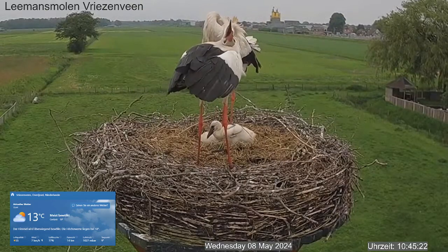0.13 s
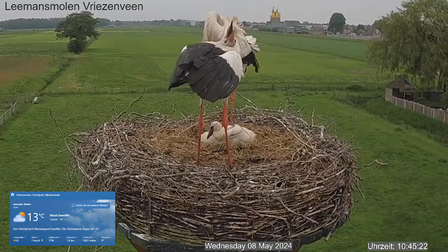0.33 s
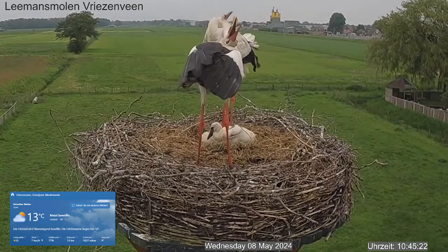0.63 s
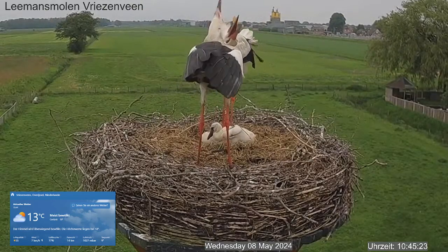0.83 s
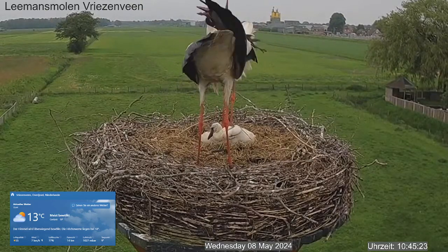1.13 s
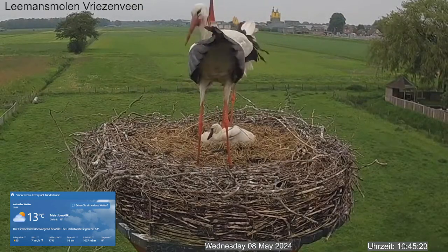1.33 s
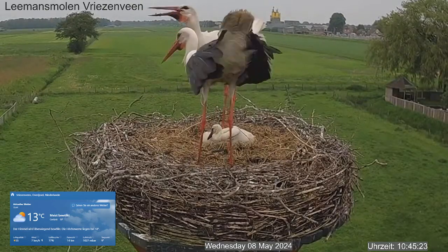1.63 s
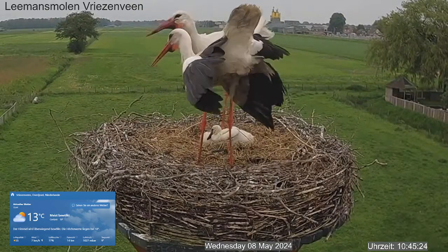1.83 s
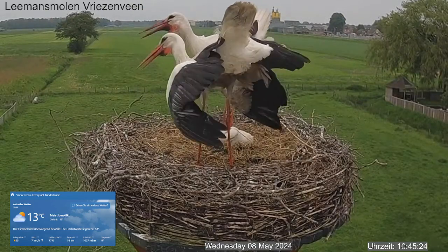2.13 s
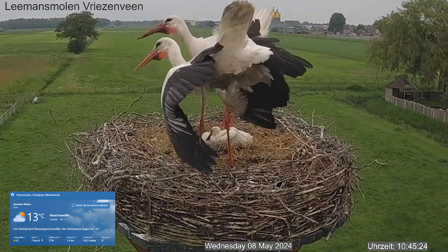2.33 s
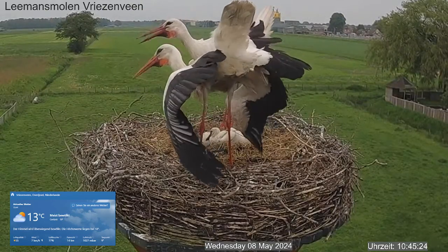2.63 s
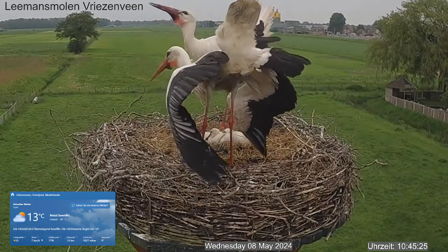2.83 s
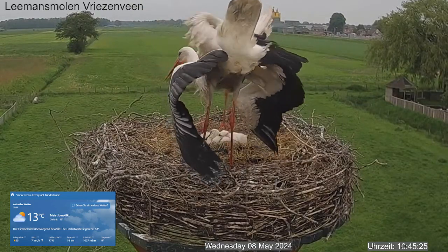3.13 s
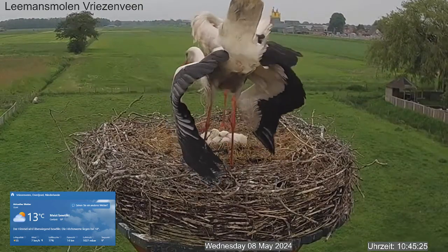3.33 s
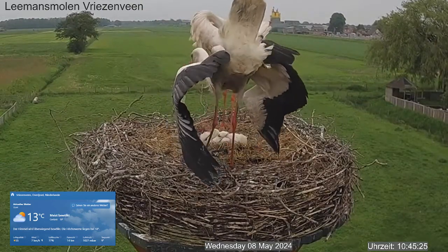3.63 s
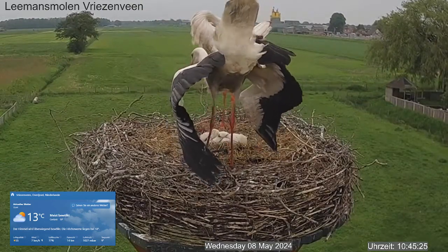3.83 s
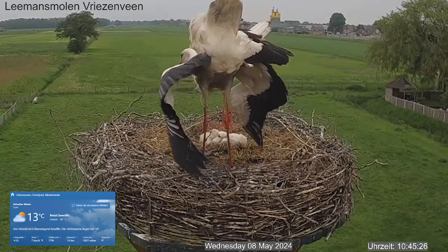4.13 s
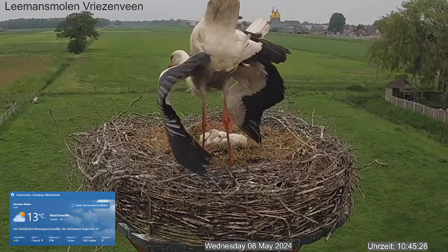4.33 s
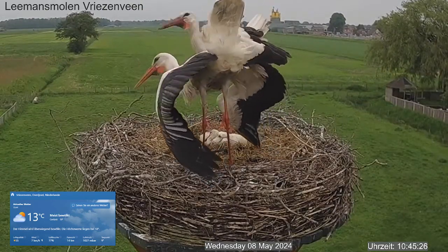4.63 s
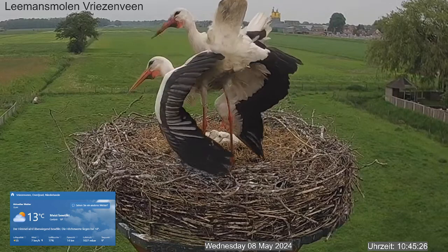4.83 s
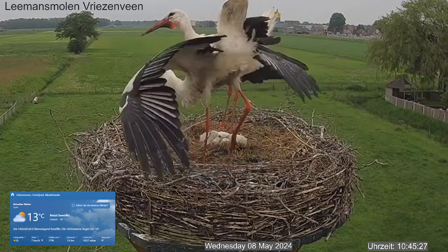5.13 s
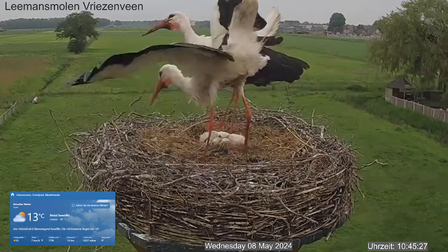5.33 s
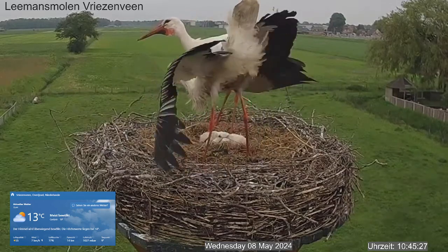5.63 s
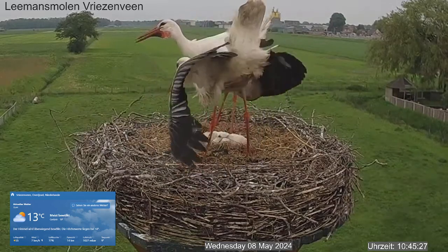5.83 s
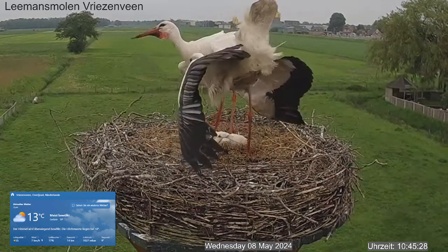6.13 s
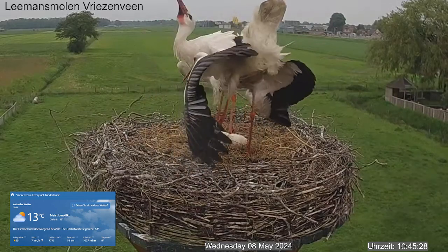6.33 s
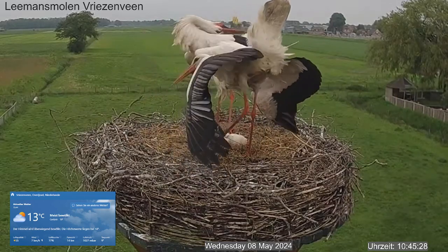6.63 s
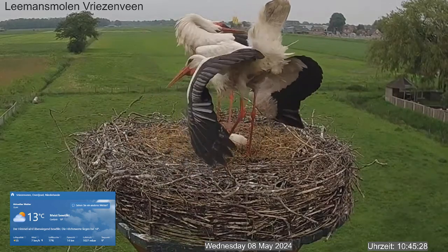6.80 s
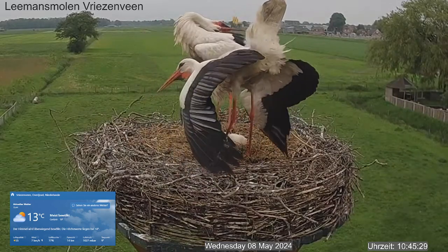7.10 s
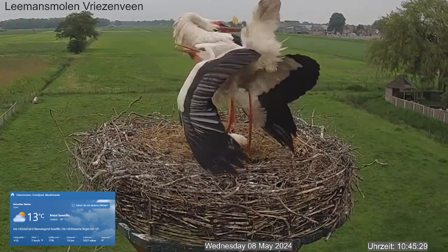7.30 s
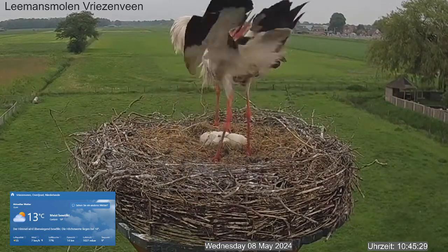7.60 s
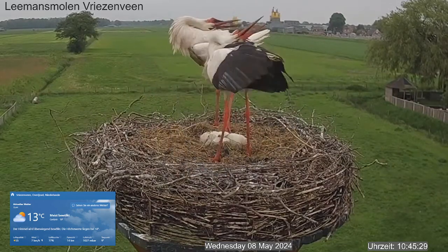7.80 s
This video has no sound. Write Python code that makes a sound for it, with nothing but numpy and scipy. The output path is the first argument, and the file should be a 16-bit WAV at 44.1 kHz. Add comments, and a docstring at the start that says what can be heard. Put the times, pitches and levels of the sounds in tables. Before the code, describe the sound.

Two storks clatter their bills together on a nest in open country. The hollow, wooden clacks run in two overlapping streams, one faster than the other, shifting in speed and pitch without stopping. Underneath, wing movements push scattered soft, low puffs of air onto the microphone. A few faint wheezy calls and feather rustles slip in between, over a very quiet outdoor hush.

```python
"""Hollow, rapid bill clatter from two white storks on a high nest in open country.
Each clack rings the bill and the throat pouch; their pitches shift as the neck bends back and forth.
Wings push puffs of air on to the microphone, thin wheezy calls sound in between, feathers rustle.
Twigs and fields echo the clatter faintly over quiet air."""
import sys
import numpy as np
from scipy import signal
from scipy.fft import rfft, irfft, next_fast_len
from scipy.io import wavfile
from scipy.ndimage import uniform_filter1d

SR = 44100
rng = np.random.default_rng(int(sys.argv[2]) if len(sys.argv) > 2 else 0)


def generate_wav(sig):
    """Save sig (samples, or channels by samples) to the path in sys.argv[1] as 16-bit PCM at SR."""
    pcm = np.round(np.clip(np.atleast_2d(sig).T, -1, 1) * 32767).astype(np.int16)
    wavfile.write(sys.argv[1], SR, pcm)


N = 351036
TIME_S = np.arange(N) / SR
CONTROL_S = TIME_S[::32]


def bill_clatter():
    """Two storks snap their bills. Neck back: bill rings low, pouch high; neck forward: the reverse."""
    # clacks: start_s, blow_db, ring_db, tick_db (ring and tick relative to the blow)
    slow_clacks = [(0.0004, 0, 7.5, -18.5), (0.094, 4.5, 5.5, -24.5), (0.1943, 4, 5.5, -28.5),
                   (0.2922, 4.5, 5.5, -27.5), (0.3923, 4, 6.5, -31), (0.4919, 3.5, 6, -30.5),
                   (0.5925, 4, 5.5, -31.5), (0.6936, 3, 7.5, -29.5), (0.8009, 3, 6.5, -27.5),
                   (0.9042, 1.5, 7.5, -27), (1.0126, 3.5, 4.0, -26.5), (1.1277, -2.5, 3.5, -25.5),
                   (1.2471, -5, -0.5, -28), (1.3752, -4.5, 4, -30.5), (1.5154, -9.5, -10, -22),
                   (1.6468, -5, -4, -22.5), (1.7891, 0.5, 1.5, -32.5), (1.9344, -1, 6, -34),
                   (2.0805, 4.0, 1.0, -28.5), (2.226, 5, 1.5, -29), (2.3724, 4.5, 2.5, -32),
                   (2.5163, 2.5, 3.5, -34.5), (2.6605, 4, 2, -33), (2.8021, 3, 1.0, -33),
                   (2.9444, 1.5, 4, -34.5), (3.0874, 0.5, 4.5, -35.5), (3.2307, 3, 3.5, -29.5),
                   (3.3724, 3.5, 1, -36.5), (3.5122, 6, -1.5, -29), (3.6549, -0.5, -0.5, -45),
                   (3.798, 1.5, -7, -43.5), (3.938, 6.5, -8.5, -36.5), (4.0798, 4, -9.5, -41),
                   (4.2197, 6.5, -5, -34), (4.3609, 4.5, 1, -41.5), (4.5046, -1.5, 7.5, -37),
                   (4.6506, 4.5, 1.5, -29.5), (4.7989, 3.5, 2, -29), (4.9458, 1, 7, -29.5),
                   (5.0915, 4, 4, -32), (5.2332, 0.5, 7, -36), (5.3789, 1, 1, -31), (5.5226, 4.5, 2, -35),
                   (5.6671, 2.5, 3, -33.5), (5.8144, -1, 5.5, -37), (5.9605, 2.5, 5.5, -36.5),
                   (6.1041, -2, 4, -38), (6.2468, 3, 5, -31), (6.3901, 3, 4.5, -31), (6.5332, 5, 1.5, -32),
                   (6.6742, -0.5, 1, -36.5), (6.8141, -2, 3, -36), (6.9509, 4.0, 1.5, -27),
                   (7.0888, 2.5, 2.0, -29.5), (7.2152, -2, 5.5, -35), (7.4712, -4, 10.5, -38),
                   (7.5582, -1.5, 12, -34), (7.6513, 2.5, 5, -39), (7.7474, 0.5, 7, -30.5),
                   (7.8404, 2.5, 5.5, -31.5), (7.9371, 4, 5.5, -32)]
    fast_clacks = [(0.087, -6.5, 8.5, -15), (0.1793, -4.5, 9, -16.5), (0.2714, -3.5, 8.0, -20),
                   (0.3647, -10, 11.5, -18.5), (0.4625, -10.0, 9, -16.5), (0.5608, -4.5, 8, -21.5),
                   (0.6585, -6, 9, -20.5), (0.7591, -4.5, 9, -17.5), (0.8627, -1.0, 5, -13.5),
                   (0.9732, 0, 9.5, -21.5), (1.0894, 2.5, 1.5, -24), (1.2096, 2, 1.5, -24),
                   (1.3306, 0, 0.5, -28), (1.4546, -1.5, 2.5, -24), (1.578, 1.5, 8, -21.5),
                   (1.7072, 2.5, 7.5, -27.5), (1.8316, 4.5, 3.5, -30.5), (1.9589, 3.5, 4, -29),
                   (2.0877, 5, 2.5, -31.5), (2.2129, 2, 7.5, -26), (2.341, 3.5, 5.5, -30.5),
                   (2.4658, -0.5, 7.5, -29.5), (2.5906, 2.5, 6, -27.5), (2.7111, 3.5, 5.5, -27),
                   (2.8207, 5, 2, -26.5), (2.9145, -5.5, 3.0, -36), (3.0918, -3, -3.5, -29.5),
                   (3.172, -22.5, 7.5, -21), (3.2519, -0.5, 7.5, -18), (3.3361, -8.5, 13.5, -17.5),
                   (3.4169, -9.0, 13, -19.5), (3.5016, -2.5, 9.5, -20.5), (3.5869, -7.0, 11.0, -20),
                   (3.67, 1.5, 6.5, -21), (3.7534, -6, 10.5, -18), (3.8398, -3, 10.5, -20.5),
                   (3.9282, -3.5, 9.5, -23), (4.0161, -6, 12.5, -34), (4.1056, 0, 7, -22),
                   (4.2013, 3, 6.5, -23), (4.306, -2.5, 10.5, -22), (4.4158, -2.5, 11, -34.5),
                   (4.5291, 2.0, 8.0, -27.5), (4.6449, -1.0, 9.5, -28), (4.7626, 0.5, 1.5, -24.5),
                   (4.8811, 3, 3, -29), (5.0055, 0.5, 7.5, -35), (5.1279, 2, 4.5, -27), (5.2547, 2, 5, -26),
                   (5.3825, 2.5, 6.5, -26), (5.5107, 2, 5, -28.5), (5.6381, -0.5, 6.5, -24.5),
                   (5.7642, -2, 9.5, -25), (5.8884, -1, 10, -27.5), (6.012, -0.5, 11, -24.5),
                   (6.1308, 1, 8.5, -25.5), (6.2362, -1.5, 11.5, -29), (6.3372, -0.5, 11, -30),
                   (6.4323, 2.5, 5.5, -32), (6.5211, -2, 1, -39), (6.6002, -11.5, 11.5, -42),
                   (6.7515, -6, 12, -23), (6.8274, -0.5, 6.5, -26), (6.9013, -3.0, 9, -27),
                   (6.9788, -2.5, 6.5, -26.5), (7.0599, -4, 10.5, -24.5), (7.1421, -1, 9, -23.5),
                   (7.2275, 2.5, 5.5, -25), (7.314, -6.0, 11.5, -29.5), (7.403, -2, 9, -36.5),
                   (7.4898, 4, -0.5, -37), (7.5783, 3.5, -1, -37), (7.6665, 3, 4.5, -40),
                   (7.7542, 4, 4.5, -38), (7.843, 5, 3, -33), (7.9429, 5.5, 4.5, -34)]
    # resonances by neck posture: time_s, bill_hz, pouch_hz, overtone_hz, bill_half_width_hz
    slow_posture = [(0, 1627, 797, 2545, 206), (.95, 1708, 833, 2520, 175), (1.14, 1810, 865, 2820, 165),
                    (1.379, 1760, 930, 2540, 130), (1.5, 2010, 830, 2530, 280),
                    (1.85, 2020, 750, 2710, 170), (2.5, 1995, 737, 2950, 134),
                    (2.799, 1970, 723, 2680, 150), (2.959, 1795, 716, 2720, 140),
                    (3.48, 1960, 730, 2760, 145), (4.34, 1955, 745, 2840, 139),
                    (4.63, 1820, 748, 2740, 142), (4.82, 1960, 742, 2810, 113),
                    (5.24, 1825, 785, 2660, 115), (5.669, 2004, 745, 2720, 90), (6.25, 1980, 766, 2760, 90),
                    (7.21, 1864, 794, 2700, 107.7), (7.461, 1544, 870, 2490, 113)]
    fast_posture = [(.08, 1650, 837, 2660, 79.6), (0.849, 1636, 813, 2560, 68.5),
                    (1.09, 1825, 755, 2880, 110), (1.21, 1890, 738, 2930, 165),
                    (1.449, 1940, 712, 2650, 221), (1.589, 1760, 688, 2530, 113),
                    (2.1, 1880, 686, 2585, 133), (2.901, 1800, 725, 2610, 121),
                    (3.101, 1570, 790, 2390, 78.5), (3.45, 1586, 883, 2600, 68),
                    (4.25, 1630, 870, 2730, 75.7), (4.639, 1786, 728, 2670, 138),
                    (4.92, 1934, 708, 2720, 135), (5.801, 1847, 693, 2600, 139),
                    (6.23, 1796, 740, 2610, 134), (6.52, 1740, 770, 2540, 70), (6.63, 1595, 875, 2200, 80),
                    (7.94, 1672, 920, 2455, 82.5)]
    # other bill modes; jaw, upper: ratio, half_width_hz; hollow (a notch): centre_hz, half_width_hz
    # ticks: pitch_hz, half_width_hz, level_db; pouch_width, overtone_width: half_width_hz
    slow_bill = dict(jaw=(0.87, 225),
                 jaw_db=-12.5, pouch_width=119.3, overtone_width=210, upper=(1.325, 137),
                 upper_db=6, hollow=(1186, 103), ticks=[(4450, 220, 2.5), (5030, 140, 6.5),
                 (5800, 530, -1.5), (6570, 450, 1)])
    fast_bill = dict(jaw=(0.87, 202), jaw_db=-3.5, pouch_width=97, overtone_width=290, upper=(1.326, 164),
                 upper_db=3.5, hollow=(1088, 167), ticks=[(4354, 220, 1), (5170, 72, 0.5), (5540, 240, 1),
                 (6135, 220, 3.5), (6566, 340, -1.5)])
    lead_s = .00033
    out = np.zeros(N)
    birds = (slow_clacks, slow_posture, slow_bill), (fast_clacks, fast_posture, fast_bill)
    for clacks, posture, bill in birds:
        times_s, *tracks = np.transpose(posture)
        for start_s, blow_db, ring_db, tick_db in clacks:
            pose = [np.interp(start_s, times_s, track) for track in tracks]
            add(out, start_s - lead_s, gain_of(blow_db) * clack(bill, ring_db, tick_db, *pose))
    return out


def clack(bill, ring_db, tick_db, bill_hz, pouch_hz, overtone_hz, bill_half_width_hz):
    """One snap rings heavily damped modes of bill and pouch, never twice alike."""
    pouch_rest_hz, bill_rest_hz, pouch_db, overtone_db = 769, 1820, .5, -5.5
    pouch_hz *= 1 + .012 * rng.standard_normal()
    overtone_hz *= 1 + .025 * rng.standard_normal()
    jaw_db = bill["jaw_db"] + .0531 * (bill_hz - bill_rest_hz)  # louder with the neck forward
    pouch_half_width_hz = bill["pouch_width"] * (pouch_hz / pouch_rest_hz) ** 2  # higher rings shorter
    upper_db = (overtone_db + tick_db) / 2 + bill["upper_db"]
    modes = [(bill_hz, bill_half_width_hz, ring_db),
             (pouch_hz, pouch_half_width_hz, pouch_db),
             (bill_hz * bill["jaw"][0], bill["jaw"][1], jaw_db),
             (overtone_hz, bill["overtone_width"], overtone_db),
             (overtone_hz * bill["upper"][0], bill["upper"][1], upper_db)]
    for pitch_hz, half_width_hz, level_db in bill["ticks"]:
        modes.append((pitch_hz, half_width_hz, tick_db + level_db + 2.5 * rng.standard_normal()))
    signed_hz = np.fft.fftfreq(2048, 1 / SR)
    hz = abs(signed_hz)
    body = np.sqrt(sum(gain_of(level_db) ** 2 / (1 + ((hz - pitch_hz) / half_width_hz) ** 2) ** 2
                       for pitch_hz, half_width_hz, level_db in modes))
    # pouch and jaw cancel between their pitches
    notch_hz = bill["hollow"][0] + .55 * (pouch_hz - pouch_rest_hz)
    body *= 1 - .93 * np.exp(-((hz - notch_hz) / bill["hollow"][1]) ** 2)
    body /= np.hypot(1, (510 / (hz + 1)) ** 6)  # a small body radiates no bass
    return mandible_strike(body, signed_hz)


def mandible_strike(body, signed_hz, rebound=.42, typical_gap_s=.0006):
    """Strikes a body spectrum: light first touch, full blow, dying rebounds."""
    hz = abs(signed_hz)
    # the edges meet at several places a moment apart, combing the treble
    lags_s = rng.uniform([.0007, .0014], [.0013, .0026])
    comb = abs(1 + .6 * np.exp(-2j * np.pi * np.outer(hz, lags_s)).sum(1)) / 1.2
    combed = body * comb ** np.clip((hz - 1900) / 1700, 0, 1)
    minimum_phase = np.exp(np.conj(signal.hilbert(np.log(combed + 3e-4))))
    gap_s = typical_gap_s * np.exp(.15 * rng.standard_normal())
    delay = np.exp(-2j * np.pi * signed_hz * gap_s)
    chatter = (delay - rebound) / (1 - rebound * delay)
    return np.fft.ifft(minimum_phase * chatter).real


def wing_gusts(wake_db=-23, wake_stretch=7):
    """Wing eddies rumble on the microphone; stronger air flutters higher, each gust's core thumps."""
    # gusts: peak_s, length_s, rumble_db, thump_db, thump_hz
    gusts = [(0.319, 0.072, -42, -52.5, 190), (0.593, 0.04, -67, -73, 380), (0.727, 0.1, -64.5, -86, 190),
             (0.889, 0.065, -64, -80, 183), (1.704, 0.03, -58, -56, 161), (1.771, 0.058, -44.5, -49.5, 178),
             (1.966, 0.07, -63, -78.5, 252), (2.27, 0.03, -70, -85, 190), (2.49, 0.11, -61, -80, 210),
             (2.718, 0.093, -54.5, -75, 209), (2.79, 0.023, -46, -54, 196), (2.87, 0.097, -48, -73, 131),
             (3.034, 0.036, -44.5, -48.5, 156), (3.12, 0.079, -49, -52, 190), (3.25, 0.13, -49, -53.5, 152),
             (3.353, 0.03, -39, -40, 247), (3.42, 0.047, -49, -66, 130), (3.79, 0.1, -56, -55.5, 161),
             (3.857, 0.018, -43.5, -43.5, 158), (3.905, 0.03, -46, -39, 198),
             (4.188, 0.098, -47.5, -60, 142), (4.309, 0.085, -50, -58.5, 206),
             (4.559, 0.076, -45.5, -48, 181), (4.69, 0.093, -49.5, -53, 193),
             (4.776, 0.015, -47, -41.5, 232), (4.953, 0.045, -46.5, -65.5, 150),
             (5.112, 0.056, -43, -49, 184), (5.353, 0.045, -54, -80, 140), (5.491, 0.053, -42.5, -51, 210),
             (5.547, 0.034, -53, -70, 121), (5.67, 0.084, -40.5, -57, 146), (5.758, 0.01, -49, -36, 221),
             (5.845, 0.1, -49.5, -69, 160), (6.139, 0.13, -51.5, -60, 183), (6.3, 0.05, -44, -52, 192),
             (6.749, 0.049, -42.5, -54.5, 168), (6.927, 0.062, -58.5, -55.5, 228),
             (7.076, 0.13, -62.5, -66, 180), (7.535, 0.035, -48.5, -40.5, 297), (7.9, 0.082, -63, -82, 180)]
    # eddy spectra: frequency_hz, level_db
    rumble_spectrum = [(8, -1), (25, 5), (60, -0.5), (110, -7.5), (170, -25), (300, -46.5), (700, -82.5)]
    flutter_spectrum = [(50, -17), (120, 11), (190, 1.5), (280, -15), (400, -32), (650, -48.5), (1500, -72)]
    # core spectrum: ratio_to_thump_hz, level_db
    thump_spectrum = [(.25, -20), (.6, -2.5), (1, -1), (1.5, -9), (2.3, -21), (4, -39.5), (10, -74)]
    power = 0
    for peak_s, length_s, rumble_db, _, _ in gusts:
        wake = gain_of(wake_db) * swell(peak_s, wake_stretch * length_s)
        power += (gain_of(rumble_db) * (swell(peak_s, length_s) + wake)) ** 2
    level_db = np.interp(TIME_S, CONTROL_S, 10 * np.log10(power + 1e-10))
    flutter_db = 1.3 * level_db  # grows faster than the rumble
    out = steadied(noise(rumble_spectrum), span_samples=2600) * gain_of(level_db)
    out += steadied(noise(flutter_spectrum), span_samples=2000) * gain_of(flutter_db)
    offset_s = TIME_S[:SR // 2] - .25
    for peak_s, length_s, _, thump_db, thump_hz in gusts:
        spectrum = [(thump_hz * ratio, db) for ratio, db in thump_spectrum]
        core = steadied(noise(spectrum, len(offset_s)), span_samples=900)
        envelope = np.exp(-abs(2 * offset_s / length_s) ** 2.14)
        add(out, peak_s + offset_s[0], gain_of(thump_db - .5) * core * envelope)
    return out


def wheezes(arch_depth=.025):
    """Hoarse whistles: noise in one narrow resonance that glides and arches."""
    # calls: start_s, length_s, start_hz, end_hz, width_hz, level_db
    calls = [(0.045, 0.16, 2200, 2930, 380, -66.5), (0.759, 0.22, 2800, 2400, 450, -63),
             (1.084, 0.067, 1310, 1147, 200, -67.5), (1.1, 0.19, 1826, 2060, 235, -63.5),
             (1.07, 0.16, 6350, 6400, 500, -82), (1.11, .17, 2830, 3190, 605, -70),
             (1.325, 0.094, 1260, 967, 160, -66), (1.456, 0.092, 2460, 2300, 300, -71),
             (1.856, 0.15, 2700, 3100, 500, -71.5), (2.404, 0.043, 3060, 3080, 123, -81),
             (2.84, 0.084, 2610, 2720, 162, -74.5), (2.895, 0.11, 2500, 2710, 130, -56),
             (2.993, 0.068, 2630, 2490, 150, -56), (3.351, 0.12, 3030, 2320, 302, -73),
             (4.252, 0.082, 2350, 2260, 150, -80.5), (6.254, 0.23, 2670, 2450, 326, -71),
             (6.581, 0.23, 2470, 2320, 220, -78), (7.206, 0.095, 2520, 2270, 181, -82),
             (7.58, 0.095, 2730, 2990, 300, -76)]
    out = np.zeros(N)
    for start_s, length_s, start_hz, end_hz, width_hz, level_db in calls:
        samples = int(length_s * SR)
        lowpass = signal.butter(3, width_hz / 2, fs=SR, output="sos")
        breath = signal.sosfilt(lowpass, rng.standard_normal((2, SR)))[:, -samples:]
        arch = 1 + arch_depth * np.sin(np.linspace(0, np.pi, samples))
        pitch_hz = np.linspace(start_hz, end_hz, samples) * arch
        carrier = np.exp(2j * np.pi * np.cumsum(pitch_hz) / SR)
        whistle = unit_rms(((breath[0] + 1j * breath[1]) * carrier).real)
        add(out, start_s, gain_of(level_db) * whistle * signal.windows.tukey(samples, .6))
    return out


def feathers(fidget_db=-83.5):
    """Feathers slide over each other with a soft, uneven hiss, never quite still."""
    # rustles: peak_s, length_s, level_db
    rustles = [(0.042, .25, -87.5), (0.711, 0.76, -74), (1.125, 0.058, -60.5), (1.225, 0.2, -69),
               (4.103, 1.2, -84.5), (6.286, .4, -82.5), (7.925, 0.35, -82)]
    # friction spectrum: frequency_hz, level_db
    spectrum = [(200, -33), (600, -11.5), (1050, 1), (1500, -3), (2000, -1), (2400, -1.5), (2900, -5.5),
                (4500, -15), (5700, -18.5), (6500, -16), (8000, -31.5)]
    scrape_db = unit_rms(uniform_filter1d(rng.standard_normal(N), size=900))
    hiss = unit_rms(noise(spectrum) * gain_of(scrape_db))
    brushing = sum(gain_of(level_db) * swell(peak_s, length_s) for peak_s, length_s, level_db in rustles)
    return hiss * np.interp(TIME_S, CONTROL_S, gain_of(fidget_db) + brushing)


def echo(sound, spectrum, t60_s, start_s):
    """Diffuse scatter: a dying noise tail that fades in from start_s."""
    time_s = TIME_S[:SR // 2]
    onset = np.clip(time_s / start_s - 1, 0, 1)
    tail = noise(spectrum, len(time_s)) * gain_of(-60 * time_s / t60_s) * onset
    return signal.fftconvolve(sound, tail / np.linalg.norm(tail))[:N]


def nest_echoes(sound):
    """Nearby twigs scatter briefly; the fields answer longer and fainter."""
    # echo spectra: frequency_hz, level_db
    twig_spectrum = [(400, -8), (730, 4), (1150, -4), (1800, -2), (3700, -4), (6000, 1), (9000, -2)]
    field_spectrum = [(400, -3), (800, -2.7), (1900, -2.5), (4000, -10.5), (9000, -1)]
    twigs = echo(sound, twig_spectrum, t60_s=.06, start_s=.0025)
    fields = echo(sound, field_spectrum, t60_s=.45, start_s=.01)
    return gain_of(-20.5) * twigs + gain_of(-38.5) * fields


def quiet_air(level_db=-80.5):
    """Steady hush of open country."""
    return gain_of(level_db) * noise([(20, 12.5), (100, 4.5), (350, 2.5), (750, 2), (1200, -7.5),
                                      (1900, -12), (3000, -9.5), (4200, -7), (7000, -11), (9000, -25)])


def noise(spectrum, samples=N):
    """Noise of rms 1, shaped by points: frequency_hz, level_db."""
    hz, db = np.transpose(spectrum)
    padded = next_fast_len(samples, real=True)
    colour_db = np.interp(np.log(np.fft.rfftfreq(padded, 1 / SR) + 1), np.log(hz), db)
    return unit_rms(irfft(rfft(rng.standard_normal(padded)) * gain_of(colour_db), padded)[:samples])


def swell(peak_s, length_s):
    """Control-rate envelope: rises to 1 at peak_s, then falls."""
    return np.exp(-abs(2 * (CONTROL_S - peak_s) / length_s) ** 1.5)


def steadied(x, span_samples):
    """Divides by the running rms."""
    return x / np.sqrt(abs(uniform_filter1d(x ** 2, span_samples)) + 1e-9)


def unit_rms(x):
    """Scales to rms 1."""
    return x / np.sqrt(np.mean(x ** 2) + 1e-20)


def gain_of(db):
    """Decibels to amplitude."""
    return 10 ** (np.asarray(db) / 20)


def add(mix, start_s, sound):
    """Mixes a sound in at start_s."""
    part = mix[max(round(start_s * SR), 0):][:len(sound)]
    part += sound[:len(part)]


def scene():
    """Both storks, their echoes and the air, in mono."""
    clatter = bill_clatter()
    return (clatter + nest_echoes(clatter) + wing_gusts() + wheezes() + feathers() + quiet_air())[None]


def record(dry):
    """Narrow microphone band: a steep low-pass."""
    cutoff_hz = 7450
    lowpass = signal.firwin(161, cutoff_hz, window=("kaiser", 7), fs=SR)
    return signal.oaconvolve(dry, lowpass[None], "same")


dry = scene()
out = record(dry)
generate_wav(out)
```